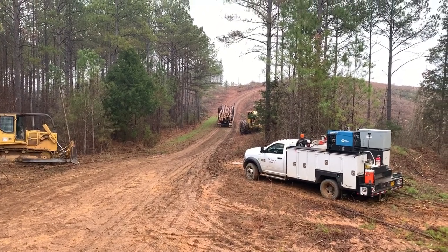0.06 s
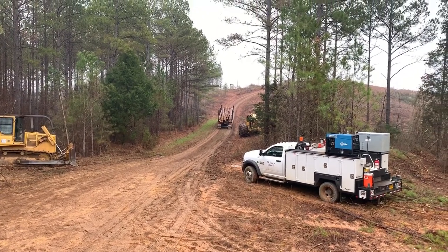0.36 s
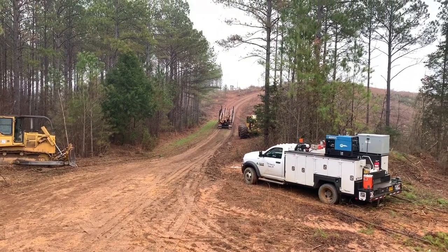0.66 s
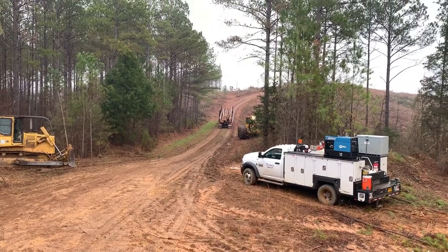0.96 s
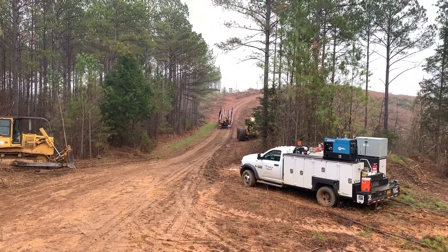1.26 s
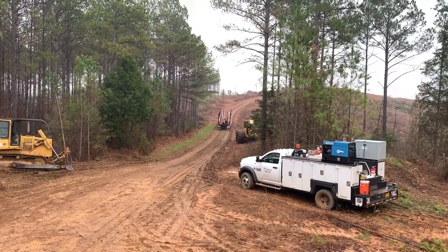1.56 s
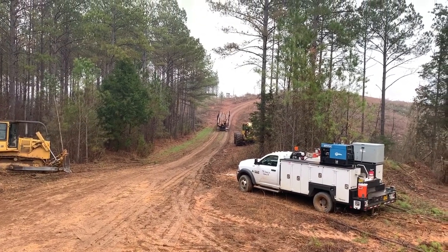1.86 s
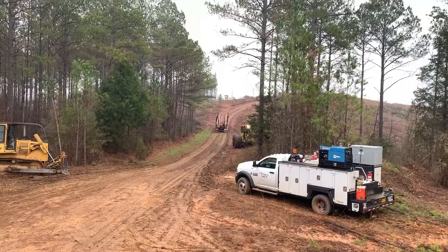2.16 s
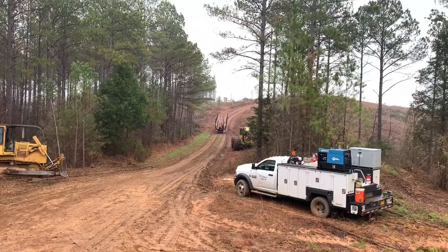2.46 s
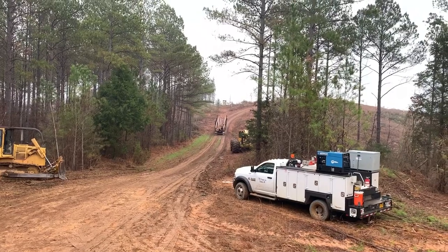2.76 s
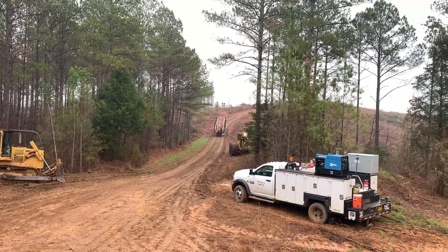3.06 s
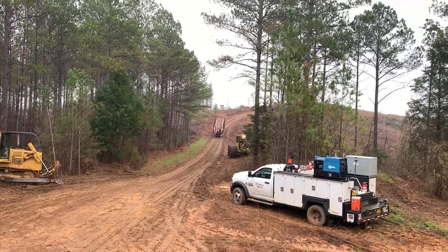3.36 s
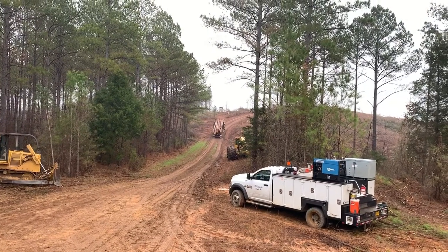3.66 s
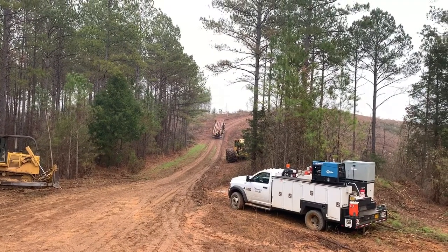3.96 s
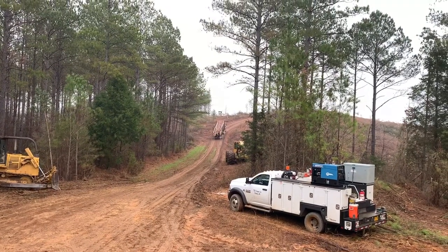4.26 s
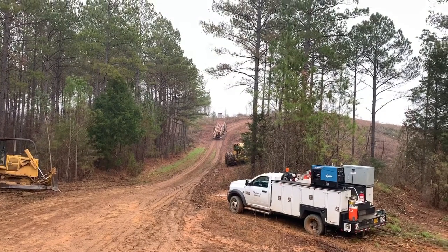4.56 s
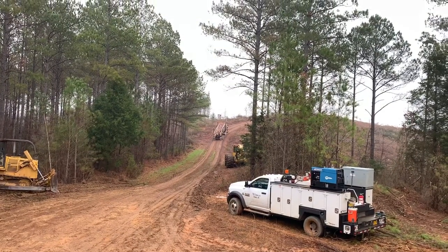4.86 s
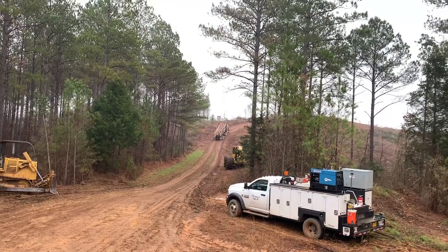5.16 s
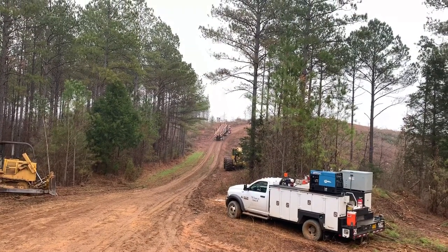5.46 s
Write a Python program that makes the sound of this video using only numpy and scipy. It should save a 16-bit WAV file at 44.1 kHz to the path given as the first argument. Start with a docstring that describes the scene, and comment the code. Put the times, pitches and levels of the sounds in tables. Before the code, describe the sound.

A big diesel engine runs outdoors among trees, heard from a distance and slightly to the left. It starts with a hard rasp, knocking and a faint puff of air, then settles into a wavering drone with fan hiss and faintly jingling steel. A second, clearer puff of air follows, and the engine's pitch sags as a loose panel rattles. Underneath lie a low rumble and another engine's steady hum.

```python
"""On a forest track, some way off, a six-cylinder diesel works under load and slows near the end.
Its firings make the exhaust drone and rasp, the engine block clatter and a loose panel rattle.
Around it are a broad roar, a low rumble, a hissing fan and a thin turbocharger whistle.
Loose steel jingles and squeaks, air is let off twice, and a second engine hums steadily behind."""
import sys
import numpy as np
from scipy import signal
from scipy.io import wavfile
from scipy.ndimage import uniform_filter1d

SR = 44100
rng = np.random.default_rng(int(sys.argv[2]) if len(sys.argv) > 2 else 0)


def log_audio(samples):
    """Write samples as a 16-bit WAV file to the path given in sys.argv[1]."""
    # one column per channel
    frames = np.atleast_2d(samples).T
    # limit to full scale, then quantise
    limited = np.clip(frames, -1, 1)
    pcm = np.round(limited * 32767).astype(np.int16)
    wavfile.write(sys.argv[1], SR, pcm)


N = 242550

# Each cylinder, in firing order: exhaust level/dB at heavy and at light load,
# knock level/dB at heavy and at light load, extra delay on the way to the pipe/ms
CYLINDER_TRAITS = [(-4, -4.5, 3, 3, .05), (3.8, 0, -1, -2, -.19), (.5, 1.5, 3, 2, -.36), (1, -.5, 3, -1, 0),
                   (.5, 2.5, 1.5, 2, -.68), (-3.5, -1, -3, -2, .37)]
# The lowest exhaust tone, one wave per firing: t/s, level/dB
LOW_TONE = [(0, -22.5), (.25, -18.5), (.8, -22.5), (1.05, -18.5), (1.25, -23.5), (1.6, -20), (2.4, -19.5),
            (3.0, -23), (3.15, -27.5), (3.52, -28.5), (3.62, -22), (3.72, -27.5), (4.15, -20.5),
            (4.55, -29.5), (4.7, -23), (4.87, -43), (5.12, -25), (5.5, -36)]
# The tone at twice that pitch, before the silencer: t/s, level/dB
DOUBLE_TONE = [(0, -13), (1.2, -14), (2.1, -16.5), (3.1, -15.5), (5.5, -20)]
# The tone at three times that pitch, before the silencer: t/s, level/dB
TRIPLE_TONE = [(0, -37.5), (0.451, -43), (.62, -26), (.9, -27), (1.2, -21.5), (1.33, -25.5), (1.45, -18),
               (1.7, -16.5), (1.9, -18.5), (2.4, -21), (3.4, -21.5), (3.55, -19.5), (3.72, -21), (4.1, -23),
               (5.5, -23.5)]
# How much each of these three tones wavers: level/dB
TONE_WAVER = [.8, .8, .7]
# Weaker tones, before the silencer: waves per crankshaft turn, level/dB
CRANK_TONES = [(8, -43), (12, -47)]
# The silencer favours three ranges of pitch: f/Hz, level/dB
SILENCER_CURVE = [(164, -25), (171, -8), (175, -2.5), (184, -1.5), (193, -5.5), (246, -7.5), (258, -0.5),
                  (268, 1.5), (279, -4.5), (290, -12.5), (355, -11.5), (370, 8), (381, -5.5)]
def exhaust_drone(fired, firing_hz, crank_waver_db=0):
    """The smooth pressure wave of the exhaust hums, throbbing because the cylinders are unequal."""
    # When the speed dips, the governor (the speed control) adds fuel and the upper two tones swell.
    dip_hz = uniform_filter1d(firing_hz, int(0.097 * SR), mode="nearest") - firing_hz
    levels_db = in_time(LOW_TONE)
    for k, curve in enumerate((DOUBLE_TONE, TRIPLE_TONE), 2):
        levels_db.append(in_time(curve)[0] + at_hz(SILENCER_CURVE, k * firing_hz) + 0.8 * dip_hz)
    throb_db = 0.072 * by_cylinder(fired, column=0)
    tones = []
    for k, db in enumerate(levels_db, 1):
        lag = .26 if k == 1 else 0  # the silencer holds the lowest tone back
        phase = 2 * np.pi * k * (fired - lag) - np.pi * k * k / 20  # the pipe delays high tones more
        tones.append(wave_height(db + throb_db + TONE_WAVER[k - 1] * drift(10)) * np.cos(phase))
    for k, db in CRANK_TONES:
        per_firing = k / 3  # three firings to a crankshaft turn
        level_db = db + at_hz(SILENCER_CURVE, per_firing * firing_hz) + crank_waver_db * drift(17)
        tones.append(wave_height(level_db) * np.cos(2 * np.pi * per_firing * fired))
    return lean_right(tones[0], db=1.72) + lean_right(sum(tones[1:]), db=0.33)


# Pitches at which the exhaust pipe rings: f/Hz, width/Hz, level/dB
PIPE_RINGS = [(377, 9.7, -7.5), (521, 28, -4), (585.8, 90, 5), (628.4, 124, 3), (704.5, 69.5, -2),
              (874, 14, -13), (997, 22, -11)]
# The hardest exhaust beats: t/s, level/dB above the usual pulse
HARD_BEATS = [(.073, 3), (.139, 1.5), (.171, 1.5), (.204, 4.5), (.332, 1.5), (.353, 5), (.456, 1.5),
              (.534, 3), (.564, 4), (.586, 3), (.650, 2), (.672, 6), (.736, 1), (.746, 3), (.957, 5),
              (1.222, 2.5)]
def exhaust_rasp(fired, firing_hz, load_db):
    """Sharp pulses, each with a gush of gas behind it, make the exhaust pipe ring."""
    late_ms = by_cylinder(fired, column=4)  # unequal paths to the pipe make the beat limp
    arrived = fired - firing_hz * late_ms / 1000
    pulse_db = np.array(CYLINDER_TRAITS)[:, :2]
    clicks = firing_clicks(arrived, pulse_db, load_db, uneven_db=.8, jitter_ms=.14)
    for s, db in HARD_BEATS:
        clicks[np.abs(np.arange(N) / SR - s) < .005] *= from_db(db)
    gas = rms_one(clicks) + from_db(-9) * bursts(clicks, decay_ms=2.3)
    pitch_scale = (firing_hz / np.median(firing_hz)) ** .55  # the ringing partly follows the speed
    brighter = from_db(0.084 * load_db)
    lower = gliding_rings(gas, PIPE_RINGS[:3], pitch_scale) / brighter
    upper = gliding_rings(gas, PIPE_RINGS[3:], pitch_scale) * brighter
    pipe = cut(cut(lower - upper, 330, "high"), 1300, "low")
    return from_left(pipe, lag_ms=.2, trees_db=-14)


# Pitches at which the engine block rings: f/Hz, width/Hz, level/dB
BLOCK_RINGS = [(1190, 1200, -14), (1522, 100, 7), (1903, 40, 4.5), (2027, 220, -0.5), (2260, 43, 0.5),
               (2350, 160, -12.5)]
# The hardest knocks: t/s, peak level/dB before filtering, f/Hz
HARD_KNOCKS = [(.022, -29, 2080), (.110, -27, 2110), (.219, -30, 2090), (.343, -30, 2150),
               (.472, -27, 2060), (.494, -29.5, 1910), (.579, -24, 2060), (.644, -29, 2000),
               (.740, -30, 2120), (.856, -27.5, 1920), (.866, -29.5, 1980), (.918, -30.5, 1900),
               (4.521, -34, 1950), (4.978, -32.5, 2080), (5.163, -33.5, 1940)]
def block_clatter(fired, level_db, load_db):
    """Each bang of burning fuel knocks the block: crisply under load, loosely without."""
    clicks = firing_clicks(fired, np.array(CYLINDER_TRAITS)[:, 2:4], load_db, uneven_db=1, jitter_ms=.3)
    crisp = np.sqrt(strain(load_db)) * bursts(clicks, decay_ms=2.1)
    loose = np.sqrt(1 - strain(load_db)) * bursts(clicks, decay_ms=8)
    block = from_db(level_db) * rms_one(rings(crisp + loose, BLOCK_RINGS))
    for s, db, hz in HARD_KNOCKS:
        blow = signal.unit_impulse(N, round(s * SR))
        ring = resonate(resonate(blow, hz, width_hz=130), hz, width_hz=400)
        block += from_db(db) * ring / np.abs(ring).max()
    block = cut(cut(block, 900, "high"), 3600, "low", order=4)
    return block.std() * from_left(block, lag_ms=.47, trees_db=-9)


# Spells of rattling: middle t/s, half length/s, level/dB, f/Hz
PANEL_SPELLS = [(.24, .025, -39.5, 2120), (.5, .45, -42.5, 2080), (1.0, .035, -39, 2060),
                (1.1, .03, -41.5, 2130), (4.545, .035, -42, 1980), (4.71, .04, -41.5, 2090),
                (4.98, .055, -41.5, 2080), (5.19, .035, -42, 1960)]
def panel_rattle(fired, load_db, width_hz=150):
    """Now and then the firings shake a loose panel into a run of ringing taps."""
    knock_db = np.array(CYLINDER_TRAITS)[:, 2:4]
    taps = bursts(firing_clicks(fired, knock_db, load_db, uneven_db=1.5, jitter_ms=.3), decay_ms=2.1)
    panel = 0
    for s, half_s, db, hz in PANEL_SPELLS:
        ring = resonate(resonate(taps, hz, width_hz), hz, width_hz)
        panel += from_db(db) * swell(s, half_s) * rms_one(ring)
    return panel.std() * from_left(panel, lag_ms=.47, trees_db=-11)


# Tone colour of the roar: f/Hz, relative level/dB
ROAR_COLOUR = [(300, -16), (550, 11), (800, -1), (1100, 0.5), (1450, -2), (1750, -5.5), (2150, -5.5),
               (2600, -17), (3100, -17.5), (4200, -18.5), (5500, -26), (8000, -34.5), (14000, -68.5)]
def roar(load_db):
    """A broad rush of noise grows with the load."""
    return from_db(-33 + 0.44 * load_db) * banded_noise(ROAR_COLOUR, flicker_db=2.2)


# Tone colour of the fan: f/Hz, relative level/dB
FAN_COLOUR = [(2000, 1), (3500, 1.5), (4500, 3.5), (6000, 3.5), (7500, 1), (9000, -4), (10800, -10.5),
              (12000, -31.5), (14000, -22)]
def fan(load_db):
    """The fan hisses, louder as the engine works harder."""
    return from_db(-59.5 + 1.1 * load_db) * banded_noise(FAN_COLOUR, flicker_db=1)


# The turbocharger's whistle: t/s, f/Hz, level/dB
TURBO_WHISTLE = [(0, 8400, -66), (.4, 8280, -63), (.95, 8470, -62.5), (1.7, 8440, -66), (2.4, 8370, -63),
                 (3.0, 8400, -64), (4.1, 8520, -69), (5.5, 8540, -74)]
def turbocharger():
    """A thin, breathy whistle glides as the turbocharger pushes more or less air."""
    hz, db = in_time(TURBO_WHISTLE)
    air = rng.standard_normal((2, N)) + 1j * rng.standard_normal((2, N))
    flutter = cut(air, 30, "low") + from_db(-11) * cut(air, 250, "low")  # thin core, wider breath
    whistle = np.real(flutter * np.exp(2j * np.pi * np.cumsum(hz) / SR))  # moved up to its pitch
    return from_db(db - 2.5 + 2 * drift(5)) * rms_one(whistle)


# Pitches at which the loose steel rings: f/Hz, width/Hz, level/dB
STEEL_RINGS = [(3294, 71, 6.5), (4070, 65, 2.5), (4470, 160, -5), (4670, 88, -1), (5470, 130, -8)]
def steel_jingle(load_db, touches_per_s=270):
    """Loose steel parts touch at random and ring; harder shaking favours the high pitches."""
    touches = rng.random(N) < touches_per_s / SR
    middle_hz = np.median(np.array(STEEL_RINGS)[:, 0])
    steel = 0
    for hz, width_hz, db in STEEL_RINGS:
        gain = from_db(db + 2 * drift(2.2) + 0.59 * load_db * (hz >= middle_hz))
        steel += gain * resonate(touches * rng.standard_normal(N), hz, width_hz)
    return from_db(-57) * from_left(steel, lag_ms=0.481, trees_db=1, spread_db=-14)


# Squeaks: middle t/s, f/Hz, level/dB, half length/s
STEEL_SLIPS = [(.35, 4440, -61, .2), (.88, 4535, -59.5, .36), (1.928, 1572, -41, .02),
               (4.845, 4070, -53, .013), (5.039, 3365, -48.5, .016), (5.105, 3335, -52, .011),
               (5.277, 4050, -54, .008)]
def steel_squeaks(wobble_hz=27.8):
    """Dry steel slips and sings for a moment."""
    out = 0
    for s, hz, db, half_s in STEEL_SLIPS:
        phase = 2 * np.pi * np.cumsum(hz + wobble_hz * drift(60)) / SR
        out += wave_height(db) * swell(s, half_s) * np.sin(phase)
    return out


# Puffs of air: t/s, level/dB, time to fade by 60 dB (in s), whistle level/dB relative to the hiss
PUFFS = [(0.354, -43, 0.58, -11), (3.626, -38.8, 0.5, -3.5)]
# Tone colour of their hiss: f/Hz, relative level/dB
PUFF_COLOUR = [(2200, -28), (3500, 11.5), (5600, 6.5), (8000, 0), (10800, -7), (12000, -33.5),
               (14000, -25.5)]
# Pitches at which the valve's outlet whistles: f/Hz, width/Hz, level/dB
VALVE_RINGS = [(3640, 80, -3), (4130, 100, -3), (5540, 70, 3.5), (5800, 80, .5), (6650, 120, -6)]
def air_valve(rise_s=0.005):
    """A valve opens quickly; its hiss and whistle die away among the trees."""
    hiss = banded_noise(PUFF_COLOUR, flicker_db=1)
    whistle = rms_one(rings(rng.standard_normal(N), VALVE_RINGS))
    out = 0
    for s, db, fade_s, whistle_db in PUFFS:
        age = np.maximum(np.arange(N) / SR - s, 0)
        gain = (1 - np.exp(-age / rise_s)) * from_db(db - 60 * age / fade_s)
        out += gain * (hiss + from_db(whistle_db) * whistle)
    return out


# Tone colour of the rumble: f/Hz, relative level/dB
RUMBLE_COLOUR = [(20, -31), (30, -20), (44, 2.5), (57, -6), (85, 8.5), (115, -7.5), (165, -3.5), (225, -2),
                 (290, -8.5), (340, -11), (450, -16), (700, -29)]
def rumble():
    """Deep noise flickers under the engine's tones."""
    return lean_right(from_db(-26) * banded_noise(RUMBLE_COLOUR, flicker_db=3.5), db=0.66)


# Hum and whine of the second engine: f/Hz, level/dB
HUM_TONES = [(40.3, -40), (60.3, -35.5), (129.7, -37), (148, -43.5), (1368, -47.5), (1427, -60)]
def second_engine():
    """A second engine holds its speed; its tones waver on their way through the air."""
    t = np.arange(N) / SR
    return sum(wave_height(db + 2 * drift(3)) * np.sin(2 * np.pi * hz * t + 0.14 * drift(1.5))
               for hz, db in HUM_TONES)


def firing_clicks(fired, cylinder_db, load_db, uneven_db, jitter_ms):
    """One click per firing; its strength depends on the cylinder, the load and a little chance."""
    at = np.flatnonzero(np.diff(np.floor(fired)))
    level_chance, time_chance = rng.standard_normal((len(at), 2)).T
    heavy_db, light_db = cylinder_db[np.floor(fired[at + 1]).astype(int) % len(cylinder_db)].T
    own_db = light_db + (heavy_db - light_db) * strain(load_db[at])
    shift = np.round(time_chance * jitter_ms * SR / 1000).astype(int)
    clicks = np.zeros(N)
    clicks[np.clip(at + shift, 0, N - 1)] = from_db(own_db + uneven_db * level_chance)
    return clicks


def by_cylinder(fired, column):
    """One trait of the cylinders, sliding from each to the next as they fire."""
    return np.interp(fired, np.arange(6), np.array(CYLINDER_TRAITS)[:, column], period=6)


def strain(load_db):
    """From 0 at light load to 1 at heavy load."""
    return np.clip(.35 + .09 * load_db, 0, 1)


def bursts(clicks, decay_ms):
    """Each click lets out a short gush of noise."""
    decay = np.exp(-1000 / (decay_ms * SR))
    return rms_one(signal.lfilter([1], [1, -decay], clicks) * rng.standard_normal(N))


def resonate(x, hz, width_hz):
    """Ring at one pitch; a smaller width rings longer."""
    r = np.exp(-np.pi * width_hz / SR)
    feedback = [1, -2 * r * np.cos(2 * np.pi * hz / SR), r * r]
    return signal.lfilter(np.array([1, 0, -1]) * (1 - r * r) / 2, feedback, x + 1e-18)


def rings(x, rows):
    """Ring at several pitches at once, every other one flipped in sign."""
    return sum((-1) ** k * from_db(db) * resonate(x, hz, width)
               for k, (hz, width, db) in enumerate(rows))


def gliding_rings(x, rows, pitch_scale):
    """Ring at pitches that slide together, by stretching and squeezing time."""
    clock = np.cumsum(pitch_scale)
    even = np.arange(clock[-1])
    return np.interp(clock, even, rings(np.interp(even, clock, x), rows))


# How alike the noise is in both ears: f/Hz, likeness (0 unrelated, 1 the same)
EAR_LIKENESS = [(60, 0.88), (200, 0.87), (320, 0), (600, 0.088), (1000, 0), (3000, 0.34), (6000, 0.04),
                (12000, .1)]
def banded_noise(colour, flicker_db):
    """Stereo noise in bands about a third of an octave wide, each flickering on its own."""
    bottom, top = colour[0][0], colour[-1][0]
    edges = np.geomspace(bottom, top, 1 + round(3 * np.log2(top / bottom)))
    white, out = rng.standard_normal((2, 2, N)), 0
    for k, (low, high) in enumerate(zip(edges, edges[1:])):
        mid, side = cut(white[k % 2], [low, high], "band")
        hz = np.sqrt(low * high)
        alike = at_hz(EAR_LIKENESS, hz)
        gain = from_db(at_hz(colour, hz) + flicker_db * drift(15))
        out += gain * (np.sqrt(1 + alike) * mid + np.sqrt(1 - alike) * side * [[1], [-1]])
    return rms_one(out)


def from_left(x, lag_ms, trees_db, spread_db=-12):
    """Tree trunks scatter the sound, and it reaches the right ear later; comes out at strength 1."""
    t = np.arange(N) / SR
    age = t[:SR // 2]
    echoes = rng.standard_normal((2, len(age))) * from_db(-60 * age / 0.23) * (age > .015)
    ahead, aside = rms_one(signal.fftconvolve(x[None], echoes, axes=1)[:, :N])
    left = rms_one(x) + from_db(trees_db) * ahead
    right = np.interp(t - lag_ms / 1000, t, left)
    both = np.array([left, right]) + from_db(spread_db) * aside * [[1], [-1]]
    return both / both.mean(axis=0).std()


def lean_right(x, db):
    """Turn the left side down and the right side up."""
    return x * from_db([[-db], [db]])


def wave_height(db):
    """The peak of a pure tone whose average (rms) level is `db`."""
    return np.sqrt(2) * from_db(db)


def swell(middle_s, half_s):
    """A bell-shaped rise and fall."""
    return np.exp(-((np.arange(N) / SR - middle_s) / half_s) ** 2)


def drift(rate):
    """A smooth random wander of typical size 1, with about `rate` swings a second."""
    step, warm_up = 40, 2000
    r = np.exp(-2 * step * np.pi * rate / SR)
    noise = rng.standard_normal(N // step + warm_up + 2)
    slow = signal.lfilter([1], [1, -2 * r, r * r], noise)[warm_up:]
    return np.interp(np.arange(N) / step, np.arange(len(slow)), rms_one(slow))


def cut(x, hz, kind, order=2):
    """Keep only the "low", "high" or "band" part of a sound."""
    return signal.sosfilt(signal.butter(order, hz, kind, fs=SR, output="sos"), x)


def in_time(rows):
    """Turn a table of times and values into one curve per value column."""
    s, *columns = np.transpose(rows)
    return [np.interp(np.arange(N) / SR, s, c) for c in columns]


def at_hz(rows, hz):
    """Read a table's value at any pitch."""
    pitches, values = np.transpose(rows)
    return np.interp(np.log(hz), np.log(pitches), values)


def from_db(db):
    """Turn decibels into a multiplier."""
    return 10 ** (np.asarray(db) / 20)


def rms_one(x):
    """Scale to an average (rms) strength of 1."""
    return x / np.sqrt(np.mean(x ** 2) + 1e-20)


# Engine speed, swinging around the governor's setting and then sagging: t/s, firing f/Hz
ENGINE_SPEED = [(0.0, 91.12), (0.18, 91.84), (0.38, 95.74), (0.66, 92.64), (0.86, 95.79), (1.08, 92.78),
                (1.32, 95.77), (1.55, 94.67), (1.79, 96.7), (2.56, 95.05), (2.88, 95.73), (3.06, 92.89),
                (3.28, 95.59), (3.56, 91.72), (3.78, 93.58), (3.93, 91.05), (5.19, 85.81), (5.5, 81.61)]
# How hard the engine works, heard in its noises: t/s, rasp level/dB, clatter level/dB
ENGINE_LOAD = [(0, -23.2, -38.5), (.6, -24.5, -43.5), (.9, -27, -38), (1.2, -27.5, -39.5),
               (1.85, -32.5, -44.5), (2.6, -32, -43.5), (3.45, -36, -43), (4.35, -32.5, -45.5),
               (4.8, -34.5, -49.5), (5.25, -31.5, -46.5)]
def scene():
    """The firings time the drone, rasp, clatter and rattle; the load lifts the noises."""
    firing_hz, = in_time(ENGINE_SPEED)
    rasp_db, clatter_db = in_time(ENGINE_LOAD)
    load_db = uniform_filter1d(rasp_db - rasp_db.mean(), SR, mode="nearest")  # 0 at average load
    fired = np.cumsum(firing_hz) / SR  # firings so far
    pulses, knocks = fired + .33, fired + .1  # both come a little ahead of the smooth wave
    exhaust = exhaust_drone(fired, firing_hz)
    exhaust += from_db(rasp_db - 2) * exhaust_rasp(pulses, firing_hz, load_db)
    clatter = block_clatter(knocks, clatter_db, load_db) + panel_rattle(knocks, load_db)
    rush = roar(load_db) + fan(load_db) + turbocharger()
    steel = steel_jingle(load_db) + steel_squeaks()
    return exhaust + clatter + rush + steel + rumble() + second_engine() + air_valve()


def record(dry):
    """The sound fades in and out over 3 ms; the deepest bass and the highest treble are cut."""
    from_edge = np.minimum(np.arange(N), np.arange(N)[::-1])
    fade = np.minimum(from_edge / (.003 * SR), 1)
    treble_cut = signal.cheby2(12, 70, 14300, fs=SR, output="sos")
    return signal.sosfilt(treble_cut, cut(dry, 41, "high", order=4) * fade)


dry = scene()
out = record(dry)
log_audio(out)
```